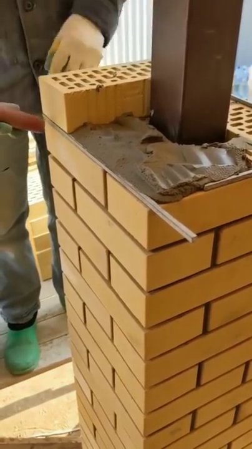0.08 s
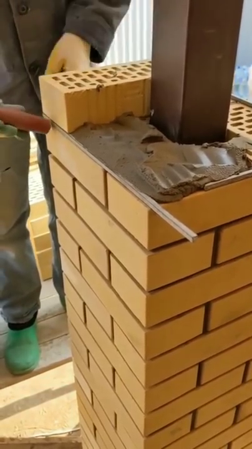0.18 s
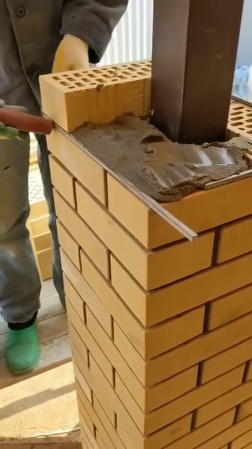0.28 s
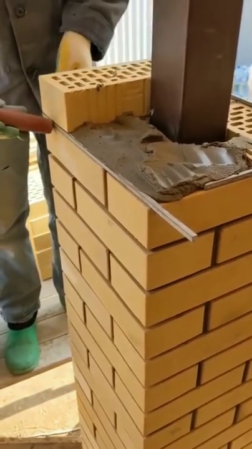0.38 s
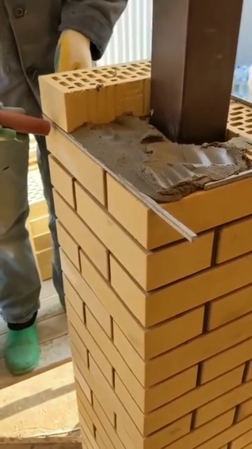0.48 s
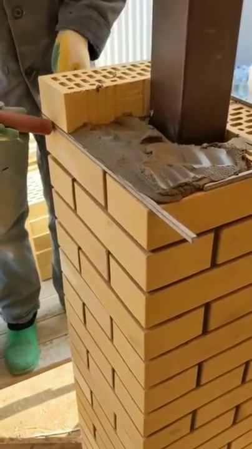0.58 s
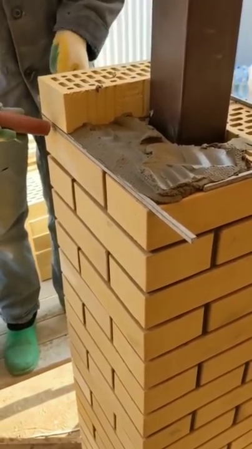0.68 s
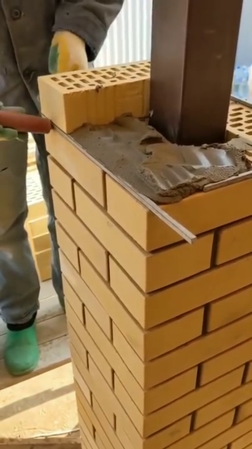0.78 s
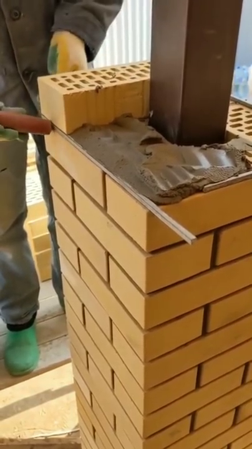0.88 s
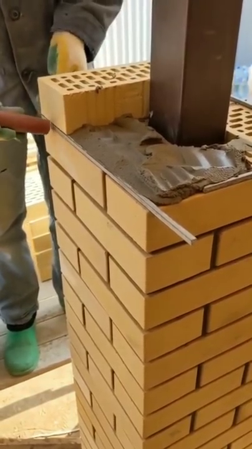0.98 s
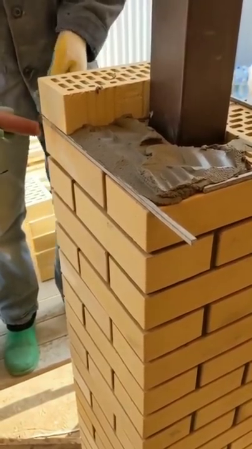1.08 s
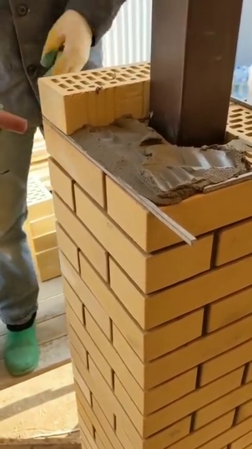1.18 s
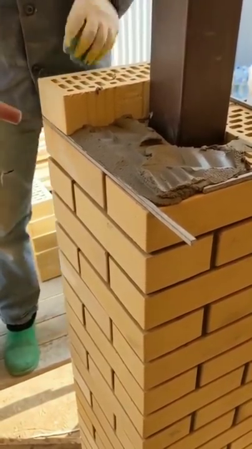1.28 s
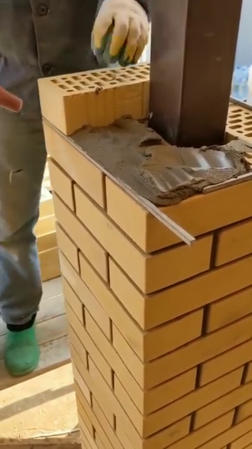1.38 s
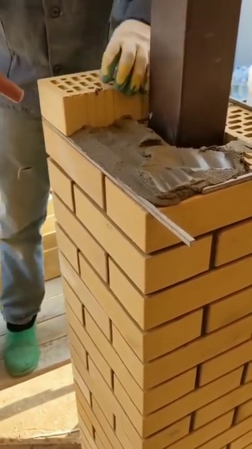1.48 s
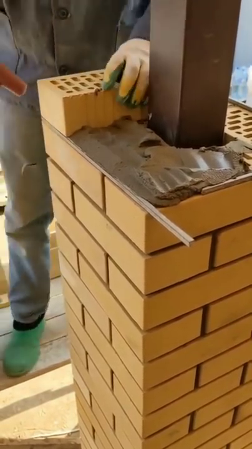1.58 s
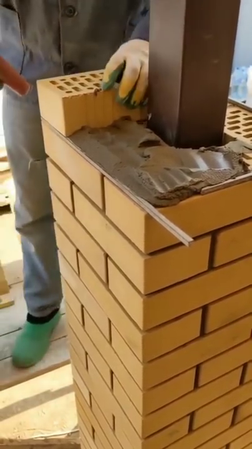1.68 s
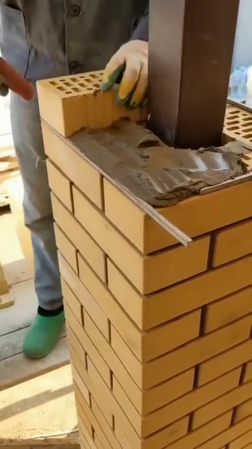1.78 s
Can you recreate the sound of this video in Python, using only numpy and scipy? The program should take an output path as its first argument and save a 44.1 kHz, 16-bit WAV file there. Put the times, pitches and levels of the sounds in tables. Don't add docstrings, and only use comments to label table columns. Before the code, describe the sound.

A steel trowel taps a hollow clay brick into mortar, then scrapes grittily along the joint.

```python
import sys
import numpy as np
from scipy import signal
from scipy.io import wavfile

SR = 44100
rng = np.random.default_rng(int(sys.argv[2]) if len(sys.argv) > 2 else 0)


def master_out(mix):
    frames = np.transpose(np.atleast_2d(mix))
    ceiling = np.clip(frames, -1, 1)
    pcm = np.round(ceiling * 32767).astype(np.int16)
    wavfile.write(sys.argv[1], SR, pcm)


def gain_from_db(level_db):
    decades = np.asarray(level_db, float) / 20
    return 10 ** decades


N = 81585
T = np.arange(N) / SR
EDGES_HZ = 24 * 2 ** np.arange(0, 9.6, 0.5)


def rms_one(x):
    return x / np.sqrt(np.mean(x ** 2) + 1e-20)


def at_hz(points, hz):
    f, value = np.array(points).T[:2]
    return np.interp(np.log(hz), np.log(f), value)


def drift(rate_hz):
    r = np.exp(-40 * np.pi * rate_hz / SR)
    settle = 3000
    slow = signal.lfilter([1], [1, -2 * r, r * r], rng.standard_normal(N // 20 + settle + 2))[settle:]
    return np.interp(np.arange(N) / 20, np.arange(len(slow)), rms_one(slow))


def ring(x, hz, t60_s):
    r = gain_from_db(-60 / (t60_s * SR))
    w = 2 * np.pi * hz / SR
    return signal.lfilter([0, np.sin(w)], [1, -2 * r * np.cos(w), r * r], x + 1e-18)


def band_pass(order, low_hz, high_hz, x):
    return signal.sosfilt(signal.butter(order, [low_hz, high_hz], "band", fs=SR, output="sos"), x)


def high_pass(order, hz, x):
    return signal.sosfilt(signal.butter(order, hz, "high", fs=SR, output="sos"), x)


def bands(gain, size):
    white = rng.standard_normal((2, size))
    total = 0
    for k, (low_hz, high_hz) in enumerate(zip(EDGES_HZ, EDGES_HZ[1:])):
        total = total + gain(np.sqrt(low_hz * high_hz)) * band_pass(2, low_hz, high_hz, white[k % 2])
    return total


def knock(events):
    push_cycles = 0.15
    out = np.zeros(N)
    for s, db, hz, cycles in events:
        push = np.sin(np.pi * np.clip((T - s) * hz / push_cycles, 0, 1)) ** 2
        out += gain_from_db(db) * ring(push / push.sum(), hz, cycles / hz)
    return out


def site():
    # f/Hz, level/dB
    spectrum = [(25, -6.5), (55, -0.5), (150, 2.5), (350, -6), (1200, -14.5), (2400, -19.5), (4000, -26),
                (14500, -40)]
    # t/s, level/dB
    bustle = [
        (0, 1),
        (.3, 1.5),
        (.9, 3.5),
        (1.3, 1),
        (1.6, -6.5),
        (1.75, -5),
        (1.85, -3.5),
    ]
    site_db, clink_db, clink_hz, clink_t60_s = -50.5, -51, 1180, 0.27
    together = drift(2.0)
    rumble = bands(lambda hz: gain_from_db(at_hz(spectrum, hz) + 2.3 * together + 1.74 * drift(3.5)), size=N)
    swell = gain_from_db(site_db + np.interp(T, *np.transpose(bustle)))
    clink = gain_from_db(clink_db - 60 * T / clink_t60_s) * np.sin(2 * np.pi * clink_hz * T)
    return swell * rms_one(rumble) + clink


def drag():
    # t/s, level/dB, blade lying flat/0-1, grit/dB
    fading = [
        (0, -55, 0.24, -25),
        (.07, -64, 0.57, -13.5),
        (.13, -85, .3, -21),
    ]
    graze = [
        (.823, -74.5, .1, 8),
        (.828, -55, .1, 8),
        (.832, -41, .1, 12),
        (.835, -69, .1, 8),
    ]
    slip = [
        (1.03, -62, 0.16, 4.6),
        (1.044, -46, .2, 3.8),
        (1.1, -48.5, 0.23, 3.6),
        (1.13, -77, .2, 6),
    ]
    shuffle = [
        (.58, -92.5, 0.326, 7),
        (0.609, -50, 0.42, -26),
        (.63, -76.5, .3, -26),
    ]
    settle = [
        (1.316, -66, 0.078, 0.0052),
        (1.324, -54.5, .1, 0.015),
        (1.345, -54, 0.089, 0.033),
        (1.369, -51.5, 0.071, 0.0056),
    ]
    along = [
        (1.355, -67, 0.2, -3),
        (1.372, -35, 0.02, -11),
        (1.391, -30.5, 0.04, -13),
        (1.45, -37, 0, -3),
        (1.501, -29.5, 0.92, -8),
        (1.528, -31.5, 1, -3.5),
        (1.571, -39, 0.96, 2.5),
        (1.61, -41.5, 0.76, -5),
        (1.67, -82, 0.2, -14.5),
    ]
    redrag = [
        (1.77, -72, .1, -3.5),
        (1.81, -49, 0.07, -5),
        (1.85, -55, 0.033, 7.5),
    ]
    # t/s, level over a fine grain/dB
    catches = [(1.389, 20.5), (1.413, 23), (1.42, 22), (1.469, 17), (1.522, 22.5), (1.525, 17),
               (1.53, 22.5), (1.545, 14)]
    # f/Hz, width/Hz, level/dB
    tilted = [(375, 680, -3.5), (1650, 100, -2.5), (1860, 230, 0), (2750, 1040, 0.5), (4370, 1000, -14)]
    lying = [(434, 57, -5.5), (652, 150, -1.5), (1030, 72, 0), (1825, 95, -6), (2226, 230, -6),
             (2590, 130, -21), (3960, 1200, -8)]
    # f/Hz, density/dB per Hz
    grit = [(150, -13.5), (400, -5), (1500, -12), (3500, -8.5), (7000, -15), (14500, -23)]
    grains_per_s, grain_spread_db, stick_db = 3500, 5, 2
    patch_db = 3

    sizes = gain_from_db(grain_spread_db * np.minimum(rng.exponential(1, N), 3)) * rng.choice([-1, 1], N)
    grains = sizes * (rng.random(N) < grains_per_s / SR) * gain_from_db(stick_db * drift(40))
    for s, db in catches:
        grains[int(s * SR)] = gain_from_db(db)
    clicks = np.diff(grains, prepend=0)
    voices = []
    for table in (tilted, lying):
        voice = np.zeros(N)
        for k, (hz, width_hz, db) in enumerate(table):
            mode = rms_one(ring(clicks, hz, 2.5 / width_hz))
            voice += gain_from_db(db + patch_db * drift(14.0)) * mode * (-1) ** k
        voices.append(rms_one(voice))
    hiss = rms_one(bands(lambda hz: gain_from_db(at_hz(grit, hz) + 0.88 * drift(30)), size=N))

    out = np.zeros(N)
    for rows in (fading, along, settle, redrag, shuffle, slip, graze):
        s, db, flat, grit_db = np.transpose(rows)
        share = np.clip(np.interp(T, s, flat), 0, 1)
        mix = np.sqrt(1 - share) * voices[0] + np.sqrt(share) * voices[1]
        mix = mix + gain_from_db(np.interp(T, s, grit_db)) * hiss
        out += gain_from_db(np.interp(T, s, db, left=-120, right=-120)) * mix
    return out


def thuds():
    # t/s, level/dB, f/Hz, ring/cycles
    dull = [(.246, -37, 410, 22), (.446, -35, 300, 12), (.468, -37, 260, 12), (.654, -33, 230, 9),
            (.657, -31, 325, 12), (.669, -32, 270, 7), (.838, -33, 430, 20), (.86, -37, 310, 20),
            (1.036, -33, 380, 24), (1.06, -37, 260, 14), (1.088, -39, 85, 7), (1.178, -35, 355, 18),
            (1.19, -36, 355, 14), (1.326, -34, 380, 15), (1.6, -40, 149, 10), (0.041, -39, 166, 4.4),
            (0.071, -36, 296, 4.1)]
    return knock(dull)


def accents():
    accent_s = [.072, .242, .249, .445, .452, .634, .635, .636, .637, .641, .761, .835, .835, .836, .836,
                .836, .838, .842, 1.0125, 1.014, 1.034, 1.036, 1.039, 1.1752, 1.1752, 1.177, 1.177, 1.179,
                1.18, 1.325, 1.366]
    # level/dB, f/Hz, ring/cycles
    modes = [(-47, 2200, 40), (-30.5, 3700, 270), (-30, 575, 54), (-17.5, 1870, 62), (-23.5, 650, 42),
             (-20, 1840, 60), (-22.5, 2490, 80), (-31.5, 5900, 480), (-22.5, 1020, 60), (-24.5, 660, 50),
             (-25, 1000, 63), (-21.5, 1600, 70), (-24.5, 5780, 200), (-22.5, 5900, 520), (-20.5, 1080, 40),
             (-22, 5900, 300), (-20.5, 1490, 130), (-20, 640, 40), (-27, 2300, 11), (-32.5, 1160, 40),
             (-23.5, 2000, 190), (-27.5, 1495, 220), (-19.5, 600, 30), (-31.5, 2400, 16), (-43.5, 4600, 22),
             (-38, 700, 50), (-35, 1540, 50), (-32.5, 1185, 85), (-37, 1460, 90), (-33.5, 1920, 65),
             (-31, 2260, 34)]
    return knock([(s, *row) for s, row in zip(accent_s, modes)])


def taps():
    # t/s, brick body/dB, brick cells/dB, blade ring/dB, blade edge/dB
    contacts = [
        (0.241, -18, -27, -27, -34),
        (0.445, -16.5, -25, -29, -28.5),
        (0.633, -12.5, -20, -18.5, -16),
        (0.759, -24, -37, -48, -49.5),
        (0.834, -10.5, -18.5, -9, -13.5),
        (1.0134, -21, -33.5, -62, -94),
        (1.032, -14.5, -22, -23.5, -29.5),
        (1.1765, -29.5, -40, -59, -74),
        (1.324, -35, -47, -72, -47),
    ]
    # f/Hz, level/dB, t60/s
    brick_body = [(431.4, -25, 0.14), (622.4, -18, 0.083), (681, -20, 0.13), (868, -22.5, 0.28),
                  (996, -22, 0.061), (1103, -16, 0.088)]
    brick_cells = [(1494, -13, 0.18), (1736, 2.5, 0.017), (1870, -8.5, 0.052), (2113, 0.5, 0.024),
                   (2214, -12, 0.12), (2250, -0.5, 0.042), (2467, -16, 0.076), (2477, -18, 0.24),
                   (3190, -5.5, 0.031)]
    blade = [(3874, -40.5, 0.026), (3980, 8, 0.012), (3930, -22.5, 0.056), (4360, -21, 0.04)]
    blade_edge = [(5340, -6, 0.041), (5165, -22.5, 0.15), (5980, -6.5, 0.039), (6810, -13.5, 0.037),
                  (7930, -30.5, .03)]
    # low/Hz, high/Hz, level/dB
    rattle = [(360, 1100, -6.5), (1280, 2830, 3), (3610, 4590, -5), (4380, 8170, 1)]
    contact_s, rattle_s, lead_s, body_lag_s = 0.0013, 0.0046, 0.0018, 0.003853
    strike_spread_db = 2
    air_hz, air_top_hz, air_db = 7630, 12900, -3

    t = np.arange(int(0.04 * SR)) / SR
    feed = t * np.exp(-t / contact_s)
    shake = (t / rattle_s) ** 0.54 * np.exp(-t / rattle_s)
    places, rings = np.zeros((3, N)), np.zeros(N)
    for family, modes in enumerate([brick_body, brick_cells, blade, blade_edge]):
        low_hz, high_hz, rattle_db = rattle[family]
        lag_s = body_lag_s * (family == 0)
        starts = [int((row[0] - lead_s + lag_s) * SR) for row in contacts]
        noise = rng.standard_normal((len(contacts), len(t)))
        grit = rms_one(band_pass(3, low_hz, high_hz, noise)) * shake
        spread_db = rng.normal(0, strike_spread_db, (len(contacts), len(modes)))
        phase = rng.uniform(0, 2 * np.pi, (len(contacts), len(modes)))
        for k, row in enumerate(contacts):
            places[k % 3, starts[k]:][:len(t)] += gain_from_db(row[1 + family] + rattle_db) * grit[k]
        for m, (hz, db, t60_s) in enumerate(modes):
            force = np.zeros(N)
            for k, row in enumerate(contacts):
                push = 2 * feed / feed.sum() * np.cos(2 * np.pi * hz * t + phase[k, m])
                force[starts[k]:][:len(t)] += gain_from_db(row[1 + family] + db + spread_db[k, m]) * push
            rings += ring(force, hz, t60_s)

    air = band_pass(2, air_hz, air_top_hz, rng.standard_normal((len(contacts), len(t)))) * shake
    for k, (_, _, cells_db, _, edge_db) in enumerate(contacts):
        places[k % 3, starts[k]:][:len(t)] += gain_from_db(0.27 * cells_db + 0.7 * edge_db + air_db) * air[k]
    return places, rings


def more_thuds():
    # t/s, level/dB, f/Hz, ring/cycles
    further = [(.3648, -27, 240, 10.0), (.3652, -31, 500, 16.0), (.375, -34, 172, 7.0), (.398, -38, 500, 8.0),
               (.7612, -25, 140, 7.0), (.7688, -23, 155, 6.5), (.7715, -31, 330, 10.0), (.785, -36, 330, 8.0),
               (1.771, -29, 72, 5.5)]
    return knock(further)


def snags():
    # t/s, level/dB, f/Hz, ring/cycles
    coarse = [(1.378, -30, 1920, 40), (1.388, -23, 2000, 40), (1.395, -25.5, 1546, 52),
              (1.407, -40, 2750, 42), (1.412, -23.5, 2930, 30), (1.416, -36, 1880, 50),
              (1.43, -30, 1840, 40), (1.435, -21, 2930, 42), (1.456, -28, 2960, 47), (1.467, -27, 2750, 85),
              (1.485, -22.5, 2800, 55), (1.488, -24, 1082, 50), (1.511, -30.5, 1800, 50),
              (1.5202, -19.5, 1078, 57), (1.521, -23, 1800, 47), (1.529, -27, 1830, 33),
              (1.538, -28.5, 445, 40), (1.552, -32.5, 1024, 27)]
    return knock(coarse)


def room(x):
    # f/Hz, t60/s
    decay = [(200, 0.38), (530, 0.27), (1390, 0.29), (3680, 0.22), (9700, 0.2)]
    # f/Hz, level/dB
    colour = [(100, 13.5), (500, -1), (2000, -1), (5000, -5), (12000, -3.5)]
    room_db, onset_s = -24.5, 0.0033
    t = T[:SR // 2]
    tail = bands(lambda hz: gain_from_db(at_hz(colour, hz) - 60 * t / at_hz(decay, hz)), size=len(t))
    build = 1 - np.exp(-(t / onset_s) ** 2)
    return gain_from_db(room_db) * signal.fftconvolve(x, tail * build)[:N]


def floor_echo(x):
    dip_hz, width_hz, share = 1253, 111, 0.65
    return x - share * signal.lfilter(*signal.iirpeak(dip_hz, dip_hz / width_hz, fs=SR), x)


def scene():
    ring_send_db, thud_send_db, drag_send_db = -8.5, -8.5, -8.5
    knock_send_hz = 330
    behind = site()
    scrape = drag()
    knocks = thuds() + accents() + more_thuds() + snags()
    places, rings = taps()
    sent = gain_from_db(ring_send_db) * rings + gain_from_db(drag_send_db) * scrape
    sent = sent + gain_from_db(thud_send_db) * high_pass(4, knock_send_hz, knocks)
    wet = room(sent) + sum(room(place) for place in places)
    close = places.sum(axis=0) + rings + knocks + scrape + wet
    return (floor_echo(close) + behind)[None]


def roll_off(x):
    return signal.sosfilt(signal.butter(12, 14750, fs=SR, output="sos"), x)


def record(dry):
    cutoff_hz, bass_cut_hz = 13880, 40
    cut = signal.sosfilt(signal.ellip(10, 0.5, 60, cutoff_hz, fs=SR, output="sos"), dry)
    cut = high_pass(3, bass_cut_hz, cut)
    return roll_off(cut)


dry = scene()
out = record(dry)
master_out(out)
```